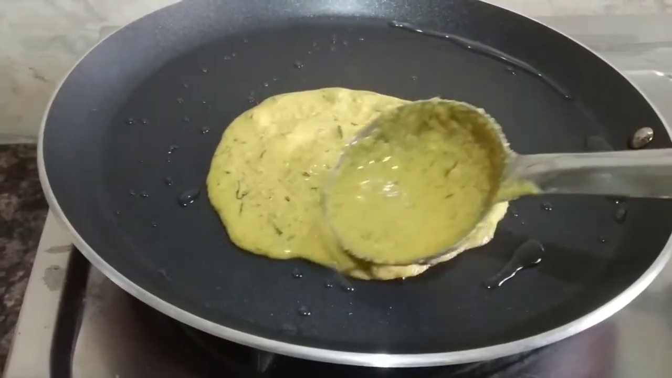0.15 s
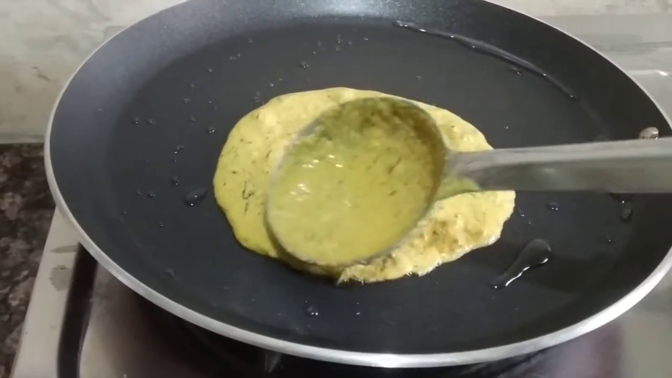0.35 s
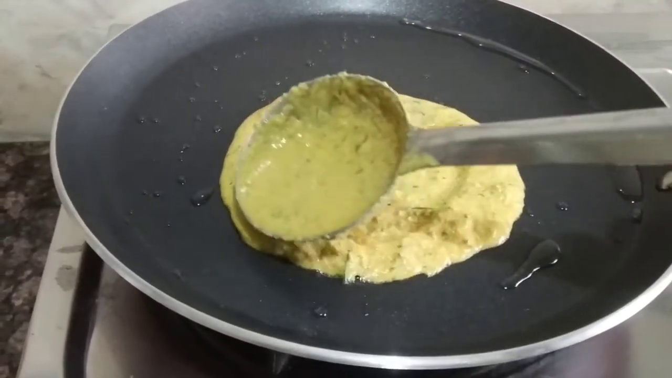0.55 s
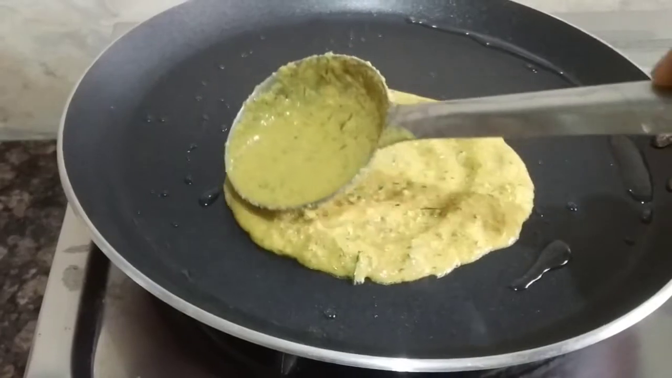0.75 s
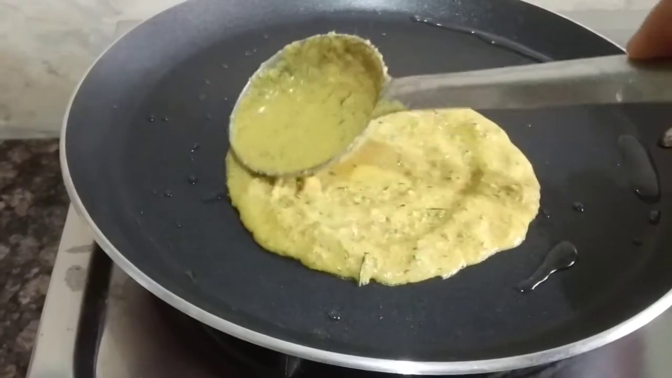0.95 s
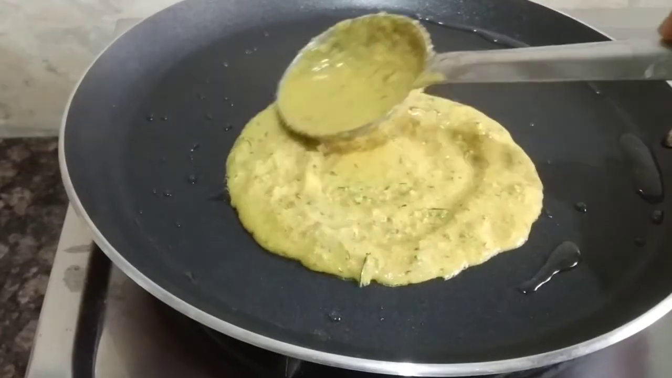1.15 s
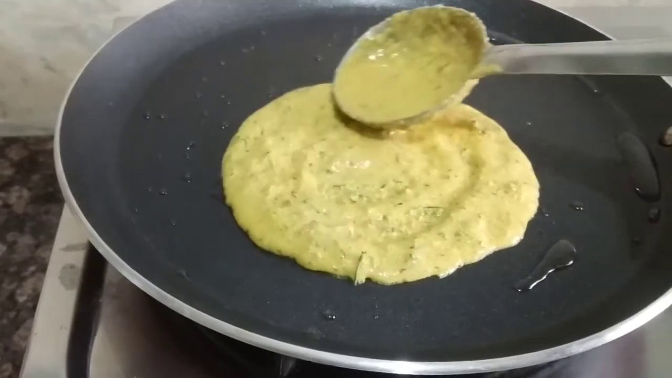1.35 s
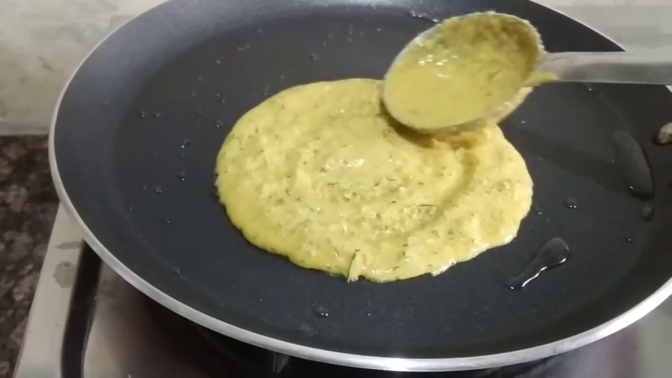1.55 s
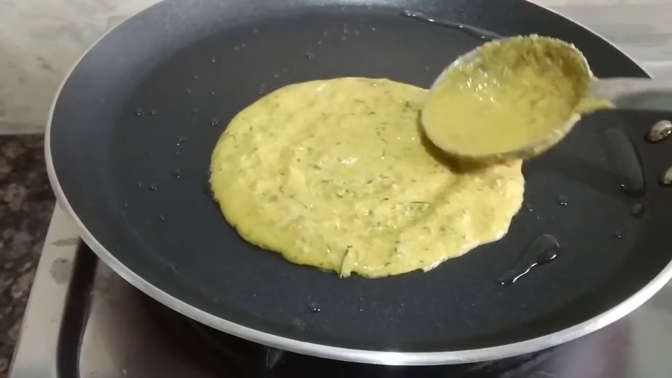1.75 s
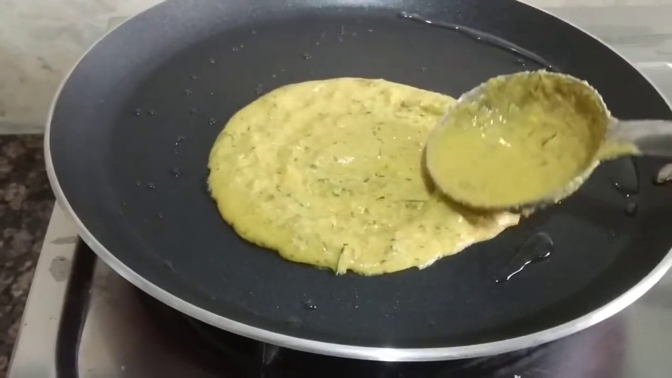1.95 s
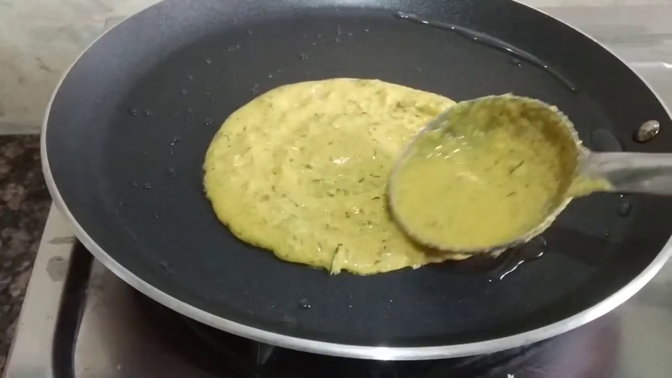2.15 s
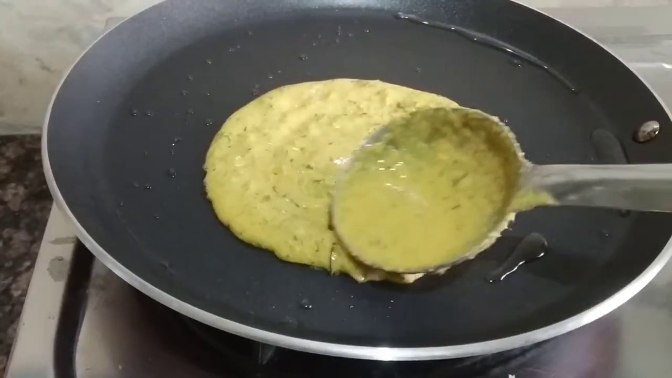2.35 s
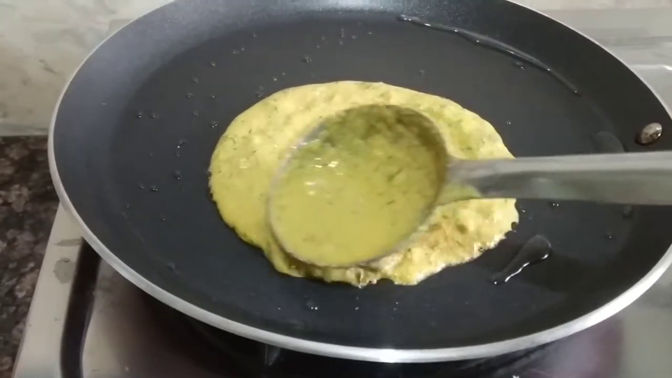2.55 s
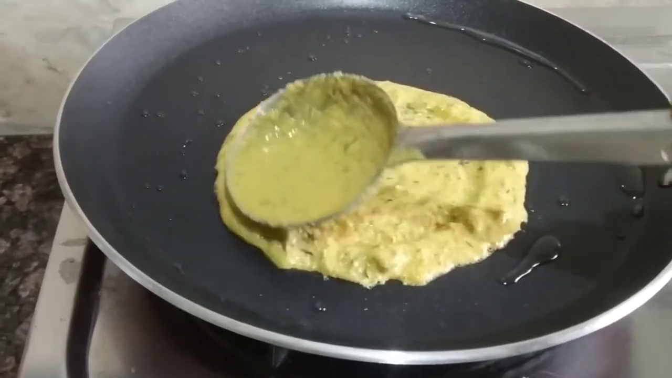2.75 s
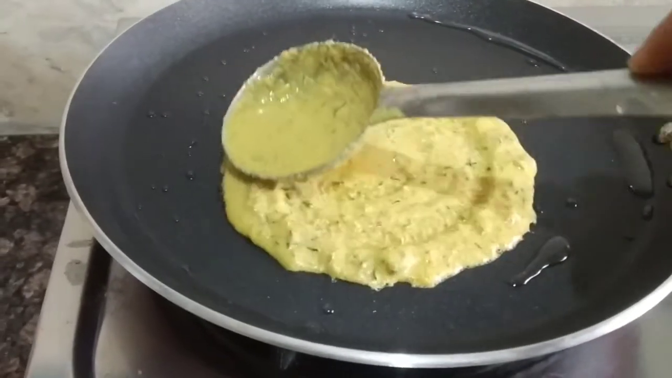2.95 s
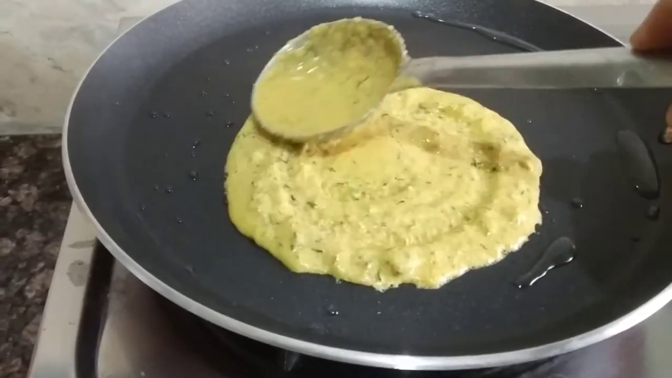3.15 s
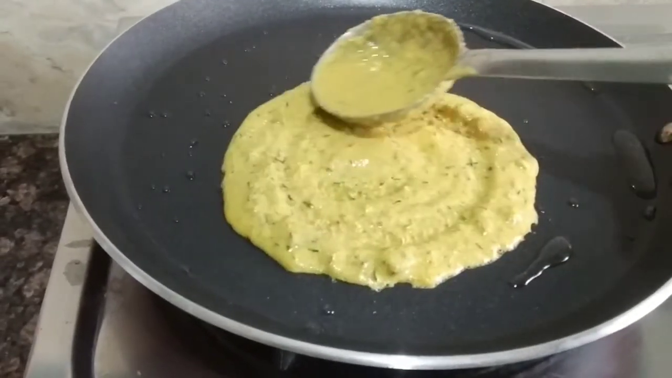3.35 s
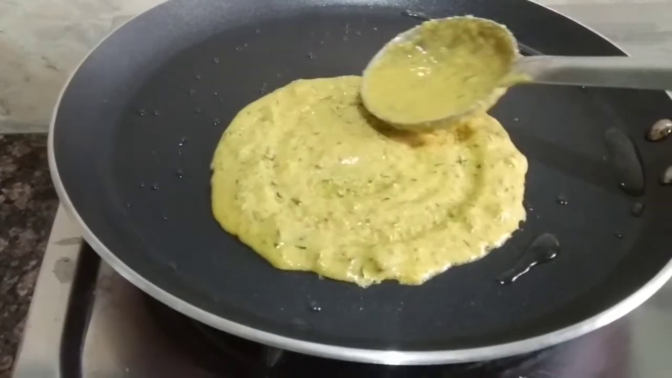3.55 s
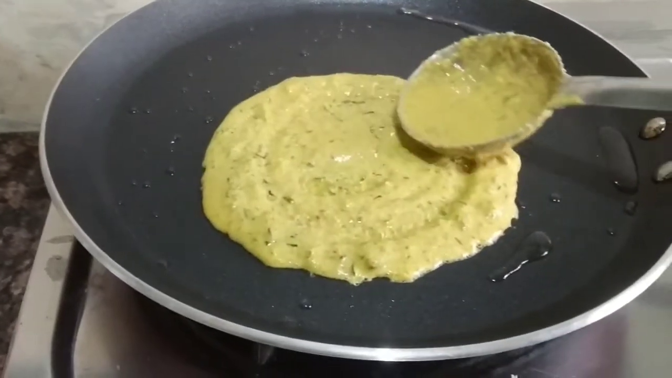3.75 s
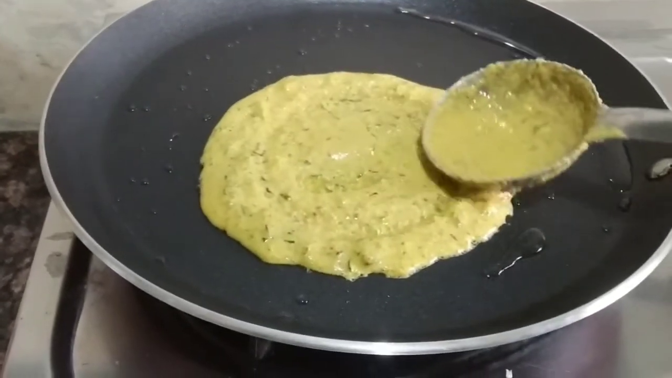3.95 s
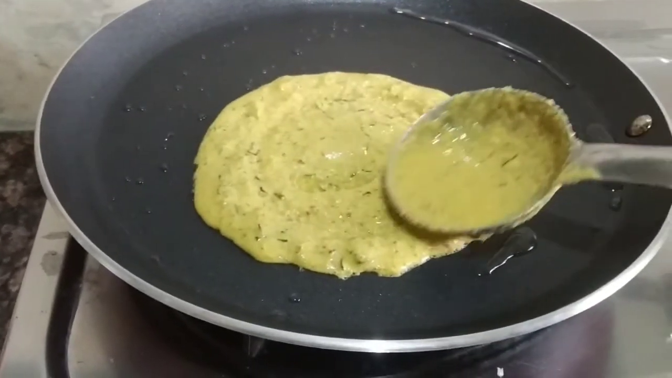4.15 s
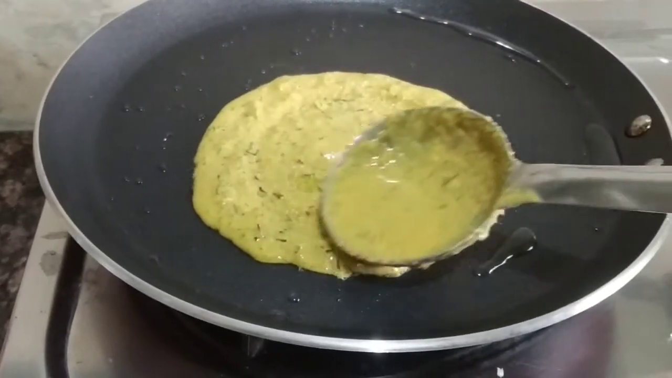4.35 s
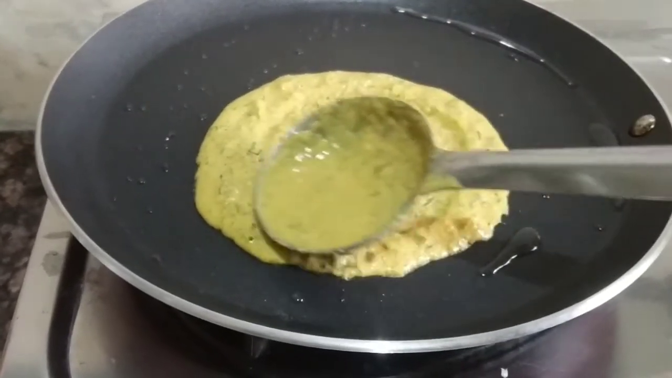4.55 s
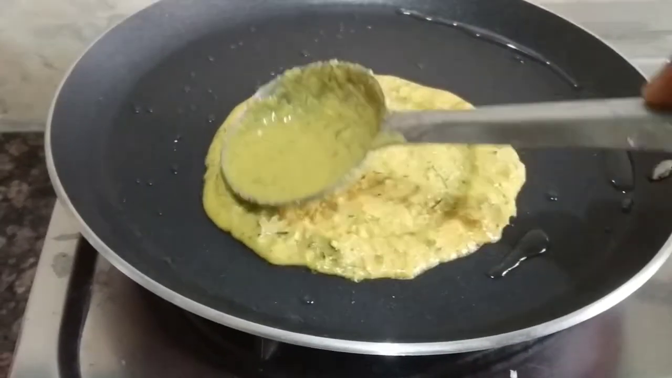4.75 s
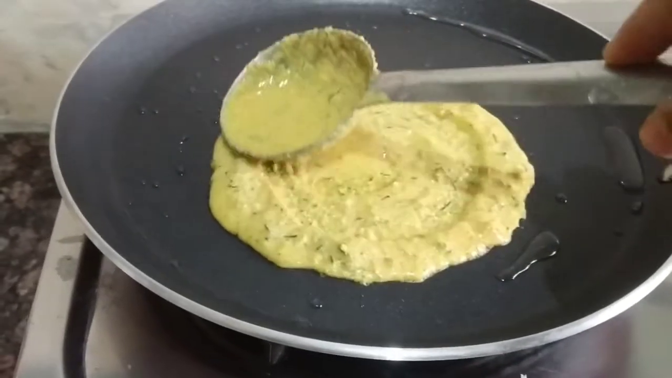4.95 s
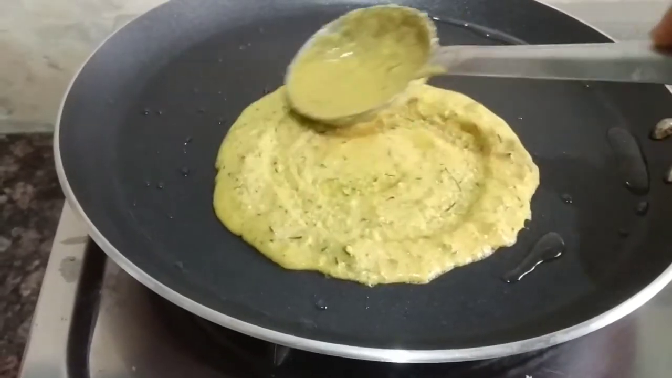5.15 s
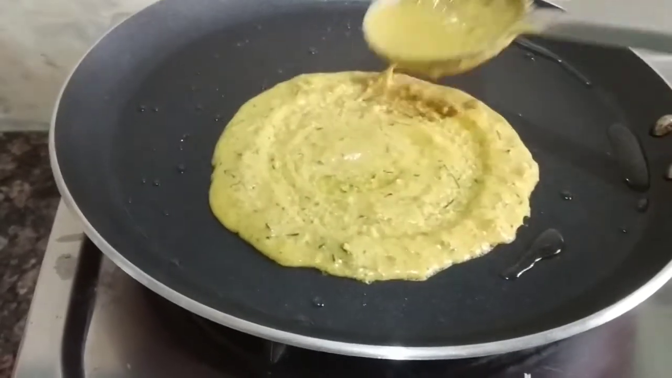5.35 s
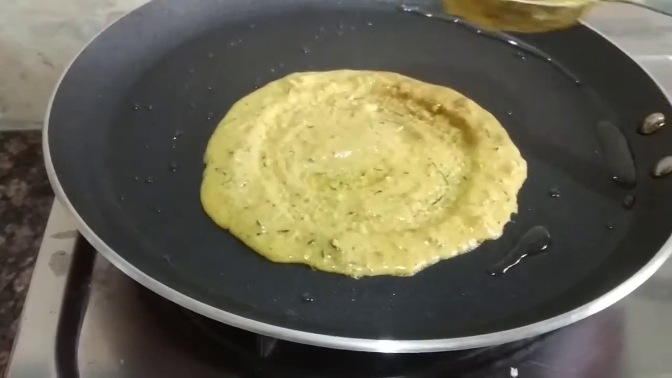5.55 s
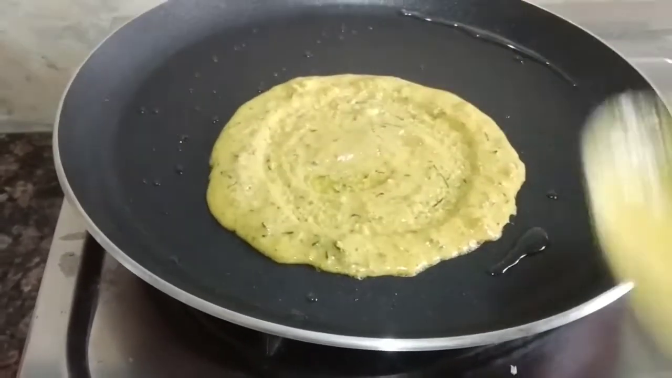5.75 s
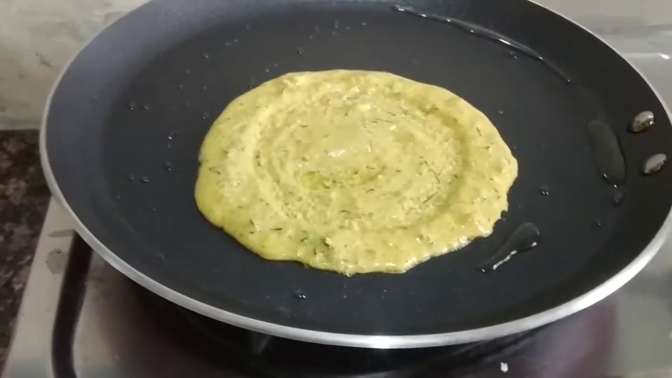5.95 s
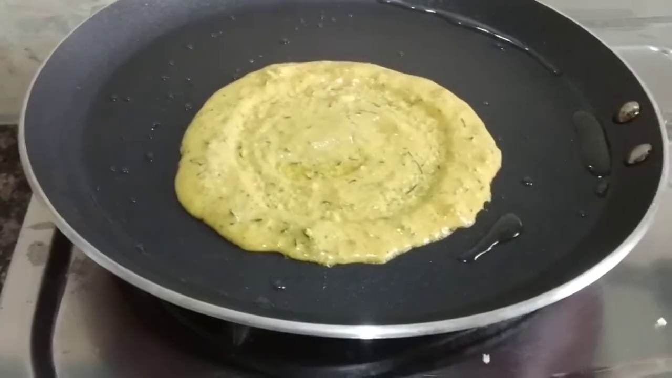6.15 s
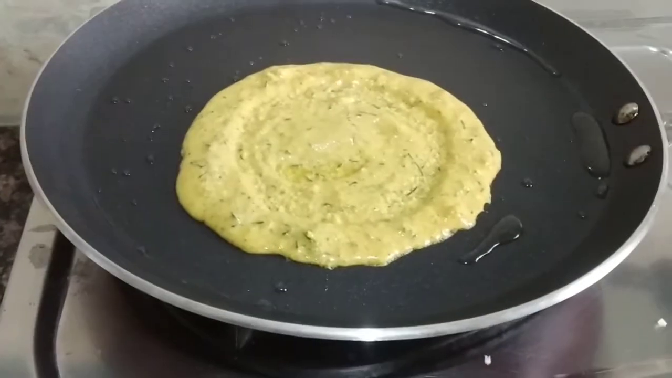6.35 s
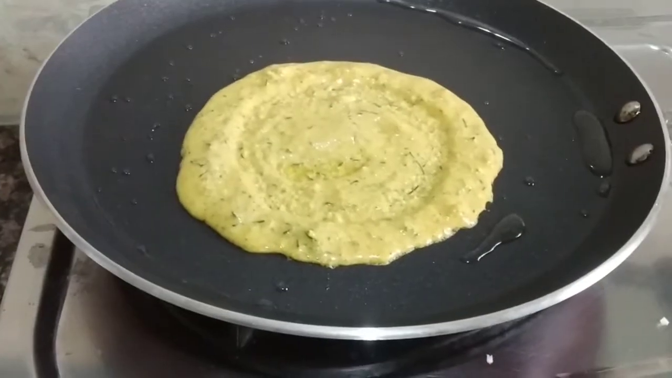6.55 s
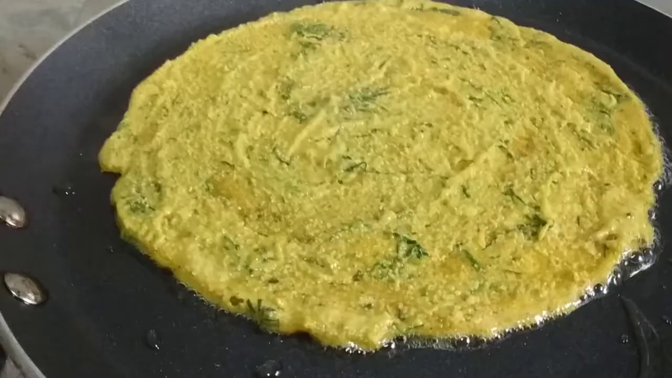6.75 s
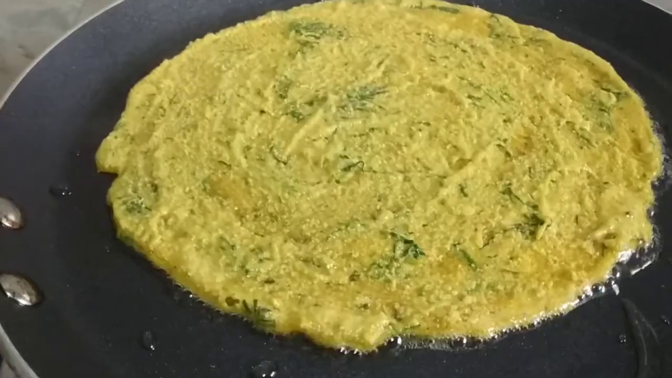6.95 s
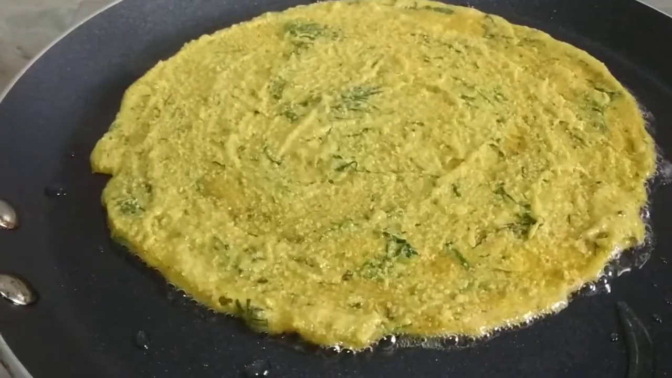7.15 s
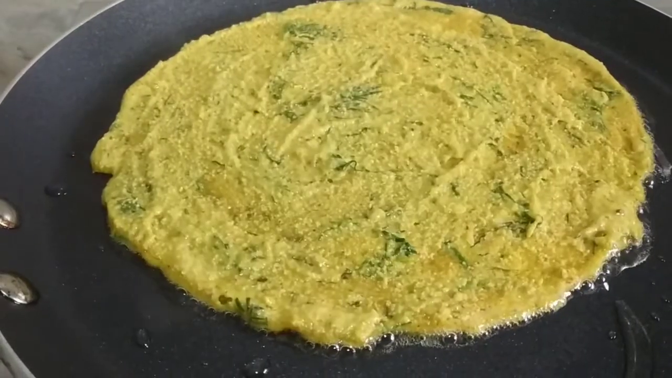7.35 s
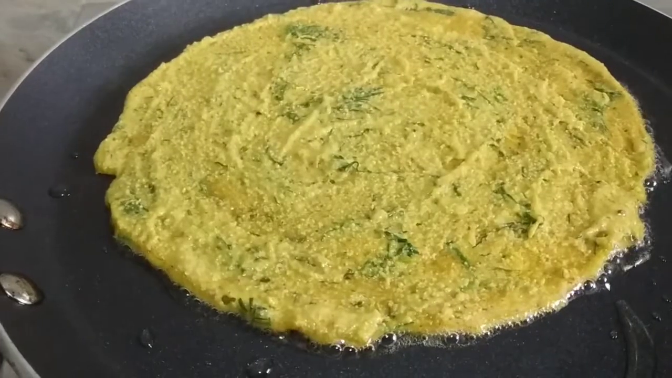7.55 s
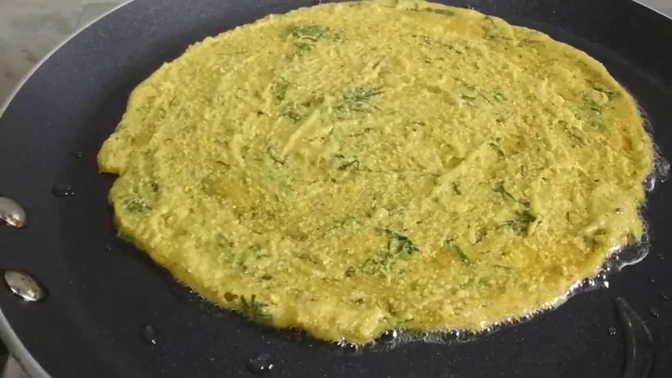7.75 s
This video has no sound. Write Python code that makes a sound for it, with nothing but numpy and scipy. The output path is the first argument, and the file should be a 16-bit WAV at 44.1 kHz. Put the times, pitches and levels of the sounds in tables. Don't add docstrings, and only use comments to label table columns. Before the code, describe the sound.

Close, crisp frying crackle slowly calms in a small hard kitchen, with snapping oil pops, a fading engine hum and one bouncing metal ladle clank.

```python
import sys
import numpy as np
from scipy import signal
from scipy.fft import rfft, irfft, next_fast_len
from scipy.io import wavfile

SR = 44100
rng = np.random.default_rng(int(sys.argv[2]) if len(sys.argv) > 2 else 0)


def gain_from_db(level_db):
    decades = np.asarray(level_db, float) / 20
    return 10 ** decades


def dump_mix(stems):
    frames = np.atleast_2d(stems).T
    limited = np.clip(frames, -1, 1)
    pcm = np.round(limited * 32767).astype(np.int16)
    wavfile.write(sys.argv[1], SR, pcm)


N = 344421
SIZE = next_fast_len(N + SR)
HZ = np.maximum(np.fft.rfftfreq(SIZE, 1 / SR), 1)

# [t/s, crackle level/dB, deep bubble level/dB]
SIZZLE_VIGOUR = [(0.0, -37.5, -57), (0.57, -41.5, -68), (0.78, -39.5, -64), (1.05, -45, -63),
                 (1.57, -41.5, -48.5), (1.76, -42, -52.5), (2.0, -40, -49.5), (2.37, -39, -54),
                 (2.6, -44, -67), (2.96, -44.5, -58.5), (3.45, -46, -62), (3.81, -40.5, -48),
                 (4.09, -43, -65), (4.3, -45.5, -56.5), (4.89, -49, -55.5), (5.5, -50, -59),
                 (6.9, -49.5, -58.5), (7.81, -50, -59.5)]


def rms_one(x):
    return x / np.sqrt(np.mean(x ** 2) + 1e-20)


def in_time(rows):
    s, *columns = np.transpose(rows)
    t = np.arange(N) / SR
    return [np.interp(t, s, column) for column in columns]


def at_hz(points, hz):
    points = np.array(points)
    return np.interp(np.log(hz), np.log(points[:, 0]), points[:, 1])


def colour(x, spectrum):
    return irfft(rfft(x, SIZE) * gain_from_db(at_hz(spectrum, HZ)), SIZE)[..., :N]


def drift(rate):
    r = np.exp(-80 * np.pi * rate / SR)
    noise = rng.standard_normal(N // 40 + 2002)
    slow = signal.lfilter([1], [1, -2 * r, r * r], noise)[2000:]
    return np.interp(np.arange(N) / 40, np.arange(len(slow)), rms_one(slow))


def ring(clicks, hz, t60):
    r = gain_from_db(-60 / (t60 * SR))
    w = 2 * np.pi * hz / SR
    return signal.lfilter([0, np.sin(w)], [1, -2 * r * np.cos(w), r * r], clicks + 1e-18)


def airy(spectrum):
    # [f/Hz, likeness from -1 to 1]
    likeness = [(60, 0.69), (130, 0.77), (290, 0.6), (640, 0.36), (1410, -0.073), (3100, 0.41),
                (6820, -0.17), (15000, -0.085)]
    mid, side = rfft(rng.standard_normal((2, SIZE)))
    alike = np.clip(at_hz(likeness, HZ), -1, 1)
    both = np.sqrt(1 + alike) * mid + np.sqrt(1 - alike) * side * [[1], [-1]]
    return rms_one(irfft(both * gain_from_db(at_hz(spectrum, HZ)), SIZE)[:, :N])


def bursts(per_s, spread_db, clumps, pitches_hz, cycles):
    sizes = gain_from_db(spread_db * np.minimum(rng.exponential(1, N), 5)) * rng.choice([-1, 1], N)
    clicks = sizes * (rng.random(N) < per_s * clumps / SR)
    spot = rng.integers(0, len(pitches_hz), N)
    out = np.zeros((2, N))
    for k, hz in enumerate(pitches_hz):
        here = ring(clicks * (spot == k), hz, cycles / hz)
        out += [np.roll(here, rng.integers(4, 10)), here]
    return rms_one(out)


def pan_echoes(x, echo_db):
    out = x.copy()
    for side in range(2):
        for lag_s in rng.uniform(.0001, .003, 5):
            out[side] += gain_from_db(echo_db) * rng.choice([-1, 1]) * np.roll(x[side], int(lag_s * SR))
    return out


def sizzle():
    # [f/Hz, level per Hz/dB]
    crackle_colour = [(2060, -24), (3500, -8.5), (4810, -8.5), (5820, -4.5), (8910, 1), (14900, 0),
                      (15600, 2.5), (16000, -32.5)]
    crackle_db, deep_db = in_time(SIZZLE_VIGOUR)
    flurries = gain_from_db(2.5 * drift(7) + 3.0 * drift(40))

    crackle = bursts(1500, 3.5, flurries, np.geomspace(5200, 15000, 14), cycles=4.7)
    crackle = rms_one(colour(pan_echoes(crackle, -10.5), crackle_colour))
    blur = airy(crackle_colour) * flurries ** 0.47

    deep = bursts(600, 2.4, flurries, np.geomspace(3000, 6000, 8), cycles=15.0)
    no_bass = signal.butter(2, 2600, "high", fs=SR, output="sos")
    deep = rms_one(signal.sosfilt(no_bass, deep))
    return gain_from_db(crackle_db) * (gain_from_db(-1.5) * crackle + blur) + gain_from_db(deep_db + 1.5) * deep


def small_pops():
    count, low_hz, high_hz = 45, 7200, 13500
    when, size, pitch = rng.random((count, 3)).T
    when = (np.arange(count) + when) / count * (N / SR - .01)
    crackle_db = in_time(SIZZLE_VIGOUR)[0][(when * SR).astype(int)]
    peak_db = crackle_db + 17.5 + 1.5 * (2 * size - 1)
    return np.transpose([when, peak_db, low_hz * (high_hz / low_hz) ** pitch])


def pops():
    # [t/s, peak level/dB, f/Hz]
    big_pops = [(0.2149, -21, 8120), (0.2583, -23, 12600), (0.4599, -16, 10000), (0.5496, -19, 9740),
                (0.596, -22.5, 9130), (0.7143, -15.5, 12400), (0.9268, -21, 7700), (0.9862, -18, 11700),
                (1.0735, -15.5, 13300), (1.2386, -16.5, 11800), (1.4083, -22, 8730), (1.6955, -30, 7700),
                (1.7828, -18.5, 9900), (2.0123, -19, 8530), (2.6948, -17, 13880), (2.8878, -26, 8200),
                (3.0091, -17, 13130), (3.4979, -27, 13450), (3.5538, -23, 8850), (3.9953, -23, 12160),
                (4.6473, -23, 13600), (4.6922, -22.5, 11600), (4.8878, -21.5, 13800), (4.9102, -24, 10700),
                (5.1607, -12.5, 11840), (5.6785, -11, 11300), (5.7214, -21.5, 11200), (6.4622, -17, 12300),
                (6.8857, -18.5, 11000), (7.1167, -14.5, 11100)]
    rows = np.vstack([big_pops, small_pops()])
    out = np.zeros((2, N))
    luck = rng.random((len(rows), 3))
    for (s, db, hz), (place, sign, side) in zip(rows, luck):
        click = np.eye(1, 40)[0]
        burst = ring(click, hz, 9.4 / hz) * np.sign(sign - .5) * gain_from_db(db + 6)
        at = round(s * SR) + 62
        lag = int(3 + 8 * place)
        pan_db = -3.0 + 3 * (2 * side - 1)
        out[0, at + lag:at + lag + 40] += burst * gain_from_db(pan_db / 2)
        out[1, at:at + 40] += burst * gain_from_db(-pan_db / 2)
    no_bass = signal.butter(2, 2500, "high", fs=SR, output="sos")
    return pan_echoes(signal.sosfilt(no_bass, out), -14.0)


def clank():
    # [t/s, blow level/dB]
    ladle_blows = [
        (6.2144, -13),
        (6.234, -20.5),
        (6.240, -24),
        (6.245, -18),
        (6.262, -25),
    ]
    # [f/Hz, level/dB, time to fall 60 dB/s, shortened to 0.41 of this when struck]
    ladle_tones = [(2040, -48, 0.26), (2290, -25, 0.54), (3700, -24, 0.31), (4150, -27, 0.34),
                   (5100, -28, 0.35), (5220, -7, 0.18), (5800, -0.5, 0.083), (5900, -13, 0.23),
                   (6342, -38, 0.13), (6848, -104, 5.0), (7171, -20.5, 0.18), (7574, -30, 0.34),
                   (7700, -24, 0.38), (7800, -8, 0.17), (8656, -27, 0.21), (8800, -31, 0.21),
                   (9195, -82, 5.0), (9534, -42, 0.31), (10420, -29, 0.47), (10940, -36, 0.42),
                   (11230, -12.5, 0.4), (12340, -42, 0.73), (12800, -38, 0.3), (13800, -16, 0.12)]
    # [f/Hz, level per Hz/dB]
    counter_colour = [(59, -57), (100, -29), (162, -9.5), (885, -10), (1920, -17.5), (2270, -16),
                      (4090, -10), (4540, -17), (5040, -14), (5840, 2), (6350, -24), (7830, -3.5),
                      (15000, -25)]
    s, blow_db = np.transpose(ladle_blows)
    at = (s * SR).astype(int)
    out, blows = np.zeros((2, N)), np.zeros(N)
    for hz, level_db, t60 in ladle_tones:
        blows[at] = gain_from_db(blow_db + level_db + 1.5 + rng.normal(0, 2.5, len(at)))
        sound = ring(blows, hz, 0.41 * t60)
        out += [np.roll(sound, int(rng.integers(2, 14))), sound]

    blows[at] = gain_from_db(blow_db)
    dying = signal.lfilter([1], [1, -gain_from_db(-60 / (0.04 * SR))], blows)
    mid, side = rng.standard_normal((2, N))
    knock = colour(dying * mid, counter_colour)
    treble = np.diff(dying * side, prepend=0)
    knock = knock + colour(treble, counter_colour) * [[1.5], [-1.5]]
    return out + gain_from_db(7) * knock


def thuds():
    # [t/s, level/dB, f/Hz]
    bump_table = [
        (1.715, -48, 900),
        (1.74, -47, 348),
        (2.7, -48.5, 1003),
        (4.25, -54, 1095),
        (5.68, -45, 1110),
        (5.70, -49, 596),
        (5.74, -43.5, 320),
        (5.801, -49.5, 167),
        (5.84, -53, 450),
    ]
    out = np.zeros(N)
    for s, db, hz in bump_table:
        puff = rng.standard_normal(1500) * np.exp(-np.arange(1500) / 390.0)
        at = int(s * SR)
        out[at:at + 1500] += gain_from_db(db - 13.5) * ring(puff, hz, 6.6 / hz)
    return out * np.ones((2, 1))


def kitchen(x):
    # [f/Hz, time to fall 60 dB/s]
    echo_t60 = [(100, 0.61), (500, 0.59), (4000, 0.42), (12000, 0.33)]
    lags_s = rng.uniform(.009, .04, (2, 8))
    per_s = -np.log(1000) / at_hz(echo_t60, HZ) - 2j * np.pi * HZ
    answer = []
    for side in lags_s:
        loops = [(-1) ** k / (np.exp(-per_s * lag) - 1) for k, lag in enumerate(side)]
        answer.append(sum(loops))
    return irfft(rfft(x, SIZE) * np.array(answer), SIZE)[:, :N]


def engine():
    # [t/s, turn rate f/Hz, level/dB]
    pulling_away = [(0.0, 23.94, -13), (0.3, 24.78, -2), (0.75, 26.44, -4.5), (1.06, 27.61, 3.5),
                    (1.58, 29.19, 1), (2.3, 31.4, -2), (2.74, 32.85, -3.5), (3.45, 35.22, -2),
                    (3.75, 35.94, -8.5), (4.66, 36.96, -10), (5.2, 38.6, -20), (5.7, 39, -45)]
    # [multiple of the turn rate, level/dB]
    engine_tones = [(1, -61.5), (2, -63), (3, -58), (4, -52.5), (5, -58.5), (6, -56), (7, -64.5), (8, -67),
                    (9, -65), (10, -70.5)]
    # [f/Hz, width/Hz, level/dB]
    house_peaks = [(32.7, 4, 5.5), (69, 14, 4), (84.3, 9.5, 1.5), (101.2, 6.8, 2), (109.6, 5.4, 4),
                   (132.9, 11.4, -3.5), (141.3, 6.9, -3), (153.5, 8.4, 1.5), (174.1, 9.8, 3.5),
                   (213.5, 12, -1), (320, 35, -1)]
    rate_hz, level_db = in_time(pulling_away)
    turns = np.cumsum(rate_hz * (1 + 0.0041 * drift(3.0))) / SR
    out = np.zeros(N)
    for k, db in engine_tones:
        multiple = np.round(k)
        hz = multiple * rate_hz[::64]
        power = 0
        for peak_hz, width_hz, peak_db in house_peaks:
            power = power + gain_from_db(2 * peak_db) / (1 + (2 * (hz - peak_hz) / width_hz) ** 2) ** 2
        through = np.repeat(np.sqrt(power), 64)[:N]
        flutter_db = 3.0 * drift(3.9)
        gain = through * gain_from_db(db + level_db + flutter_db)
        out += gain * np.sin(2 * np.pi * (multiple * turns + rng.random()))
    return out


def flame_and_street():
    # [f/Hz, level per Hz/dB]
    hiss_colour = [(150, -46), (250, -4.5), (624, -1), (1030, 0.5), (2240, -2.5), (2480, 1.5), (3140, -9),
                   (3480, -23), (5000, -22), (6500, -50), (11000, -120)]
    # [t/s, level/dB]
    street_level = [
        (0.0, -64.5),
        (1.5, -63),
        (3.0, -65.5),
        (4.8, -61),
        (5.4, -62.5),
        (7.0, -57),
        (7.39, -57),
    ]
    street = gain_from_db(in_time(street_level)[0]) * (np.arange(N) / SR < 7.4)
    return np.hypot(gain_from_db(-62.5), street) * airy(hiss_colour)


def rumble():
    # [f/Hz, level per Hz/dB]
    rumble_colour = [(8.8, -26), (15, 5.5), (32, -5.5), (135, -12), (237, -20), (400, -19.5), (520, -49),
                     (880, -120)]
    return gain_from_db(-54.5 + 0.9 * drift(1.7)) * airy(rumble_colour)


def scene():
    # [f/Hz, difference/dB]
    shadow = [(60, -3.5), (110, 0), (200, -1.5), (380, -0.5), (700, 0.0), (1290, -0.5), (2380, 0.5),
              (4400, -2.5), (8120, -5.5), (15000, 0)]
    pan = sizzle() + pops()
    ladle = clank()
    bumps = thuds()
    wet = kitchen(gain_from_db(-12.5) * pan.mean(0) + gain_from_db(-10.5) * ladle.mean(0) + gain_from_db(-7.5) * bumps[0])
    behind = flame_and_street() + rumble() + engine()
    shade = gain_from_db(at_hz(shadow, HZ) / 2 * np.array([[1], [-1]]))
    shaded = irfft(rfft(pan + behind + ladle, SIZE) * shade, SIZE)[:, :N]
    return shaded + bumps + wet


def top_cut(x):
    return signal.sosfilt(signal.butter(12, 16810, fs=SR, output="sos"), x)


def record(dry):
    steep_cut = signal.cheby2(10, 30, 15900, fs=SR, output="sos")
    mix = signal.sosfilt(steep_cut, dry)
    return top_cut(mix)


dry = scene()
out = record(dry)
dump_mix(out)
```